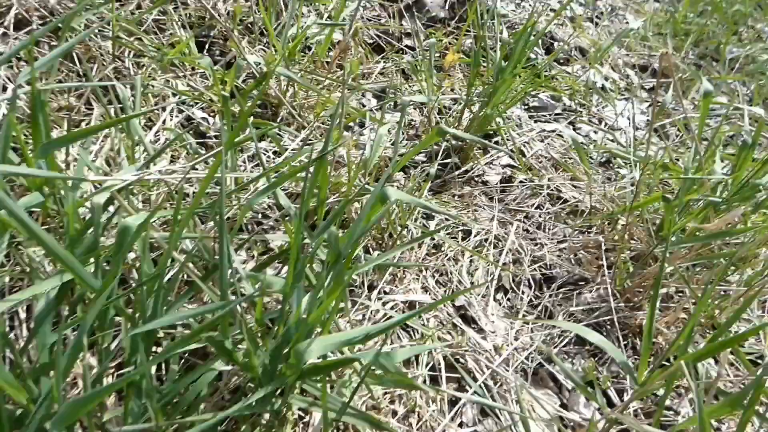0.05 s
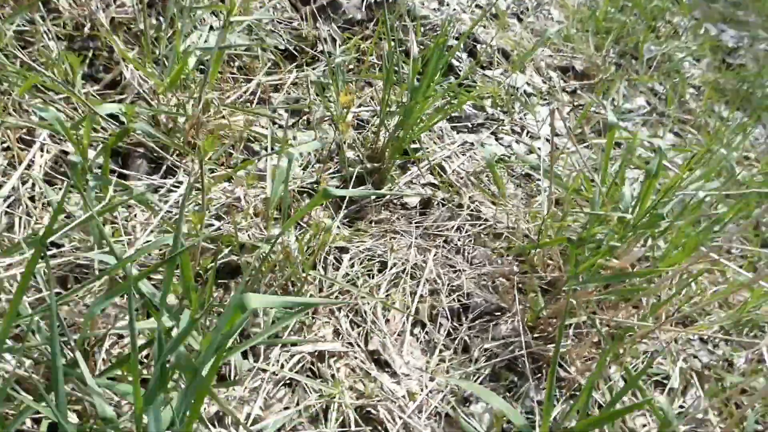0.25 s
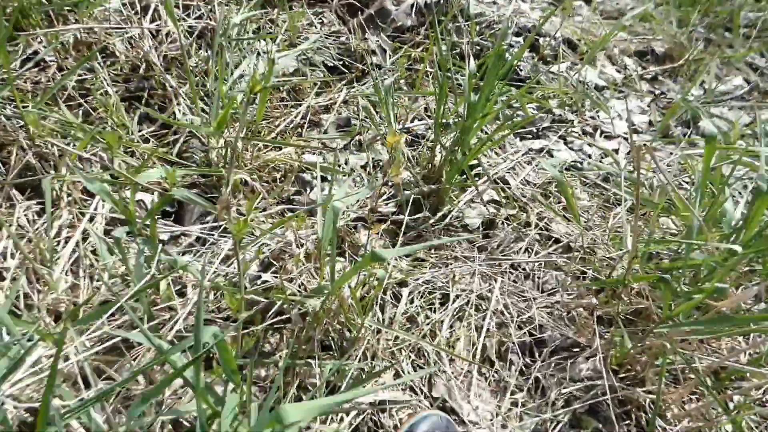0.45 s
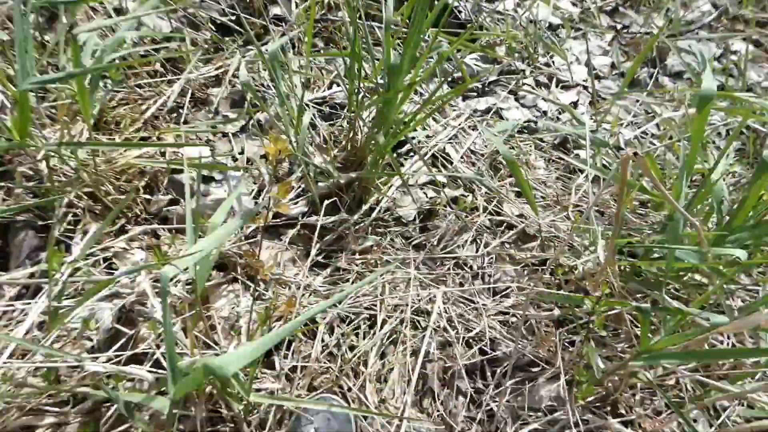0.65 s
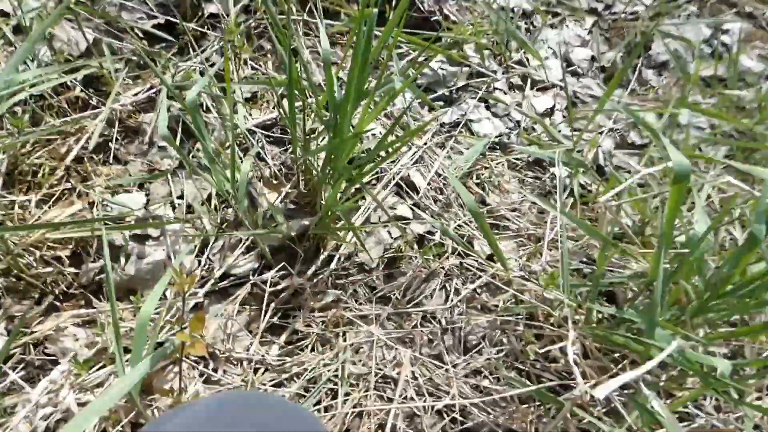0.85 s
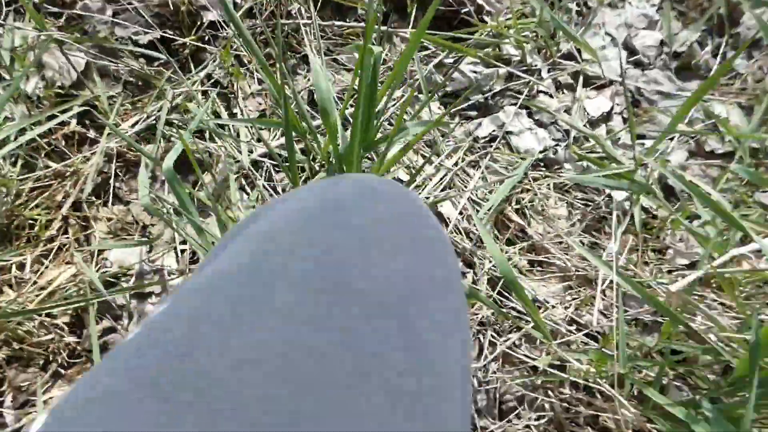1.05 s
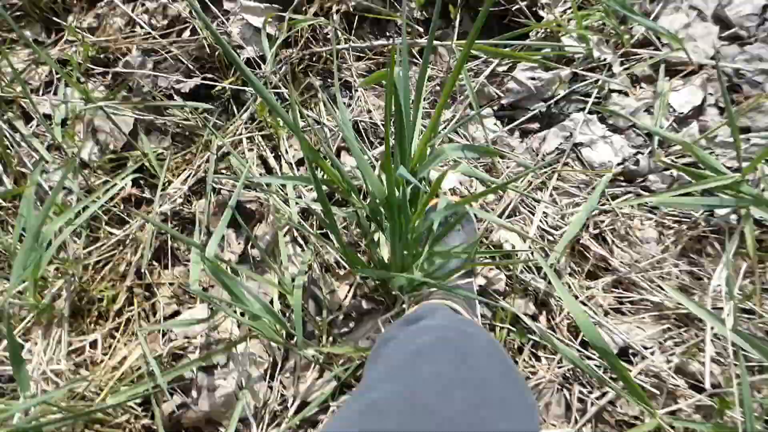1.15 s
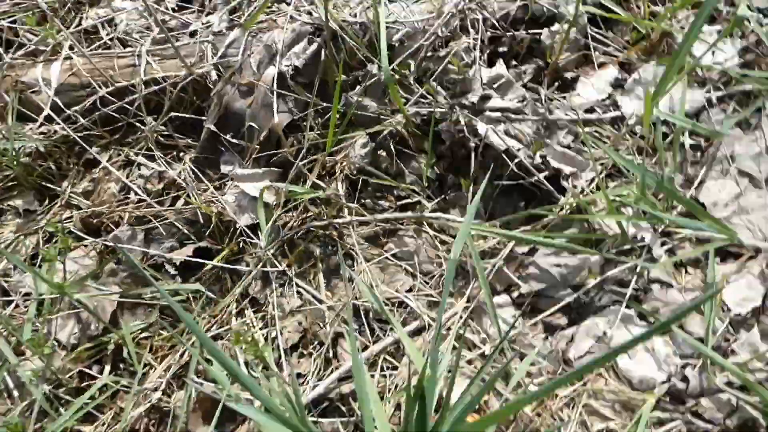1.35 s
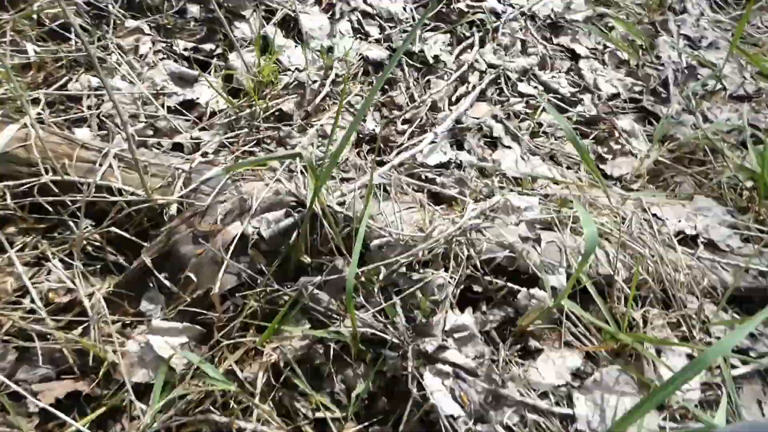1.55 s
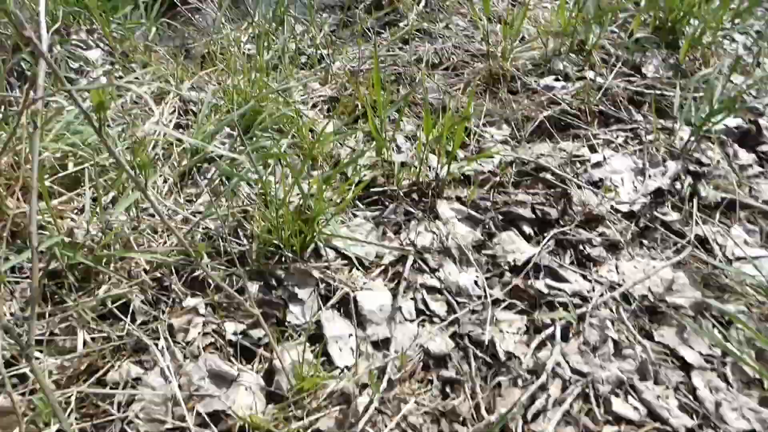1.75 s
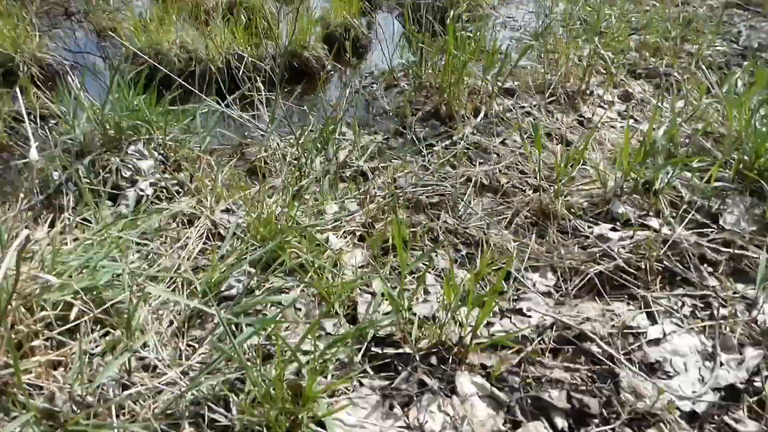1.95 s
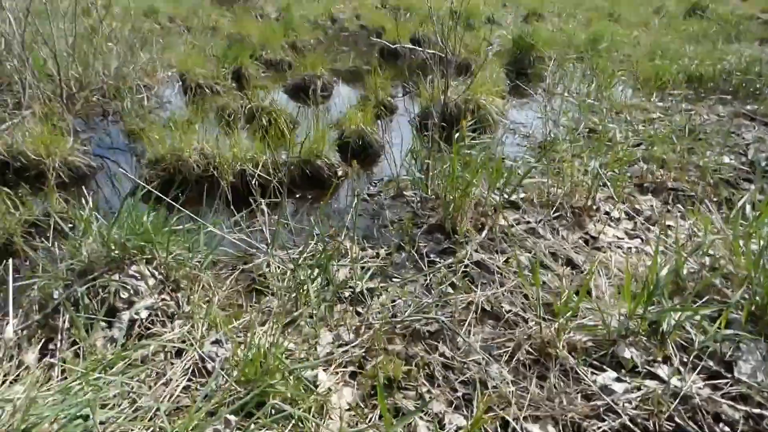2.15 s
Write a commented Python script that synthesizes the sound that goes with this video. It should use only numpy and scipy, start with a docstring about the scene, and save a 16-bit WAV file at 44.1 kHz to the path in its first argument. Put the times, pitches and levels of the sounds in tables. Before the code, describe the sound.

Three soft footsteps crunch through grass and dead leaves, with small stalks snapping.

```python
"""In the woods, someone carrying a camera takes three steps through grass and dead leaves.
Each sole crushes a shower of dry blades, which go on crackling as they settle. Single stalks snap,
legs rustle through the grass, and the air moves softly behind it all. Low bumps of air and handling
reach the microphone, and near the end something, probably a stem, scrapes briefly across it."""
import sys
import numpy as np
from scipy import signal
from scipy.fft import rfft, irfft
from scipy.io import wavfile

SR = 44100
rng = np.random.default_rng(int(sys.argv[2]) if len(sys.argv) > 2 else 0)


def materialize(psi):
    """Save the field psi as 16-bit PCM at rate SR to the path in sys.argv[1].

    A 1-D psi becomes a single channel; in a 2-D psi each row is a channel.
    """
    bounded = np.clip(np.atleast_2d(psi).T, -1, 1)
    quanta = np.round(bounded * 32767).astype(np.int16)
    wavfile.write(sys.argv[1], SR, quanta)


N = 96534
HIGHEST_HZ = 16200

# The tone of crushed blades and leaves: (frequency [Hz], relative level [dB])
CRUSH_TONE = [(60, -14.5), (250, -12.5), (550, -0.5), (1100, -0.5), (2600, 4), (3900, 0), (6000, 2.5),
              (7000, 0.5), (7900, -5.5), (10000, -1.5), (11500, -9.5), (13200, -15.5), (15500, -39)]
# Each press of a sole; the last step presses twice: (time of full weight [s], level [dB], rise [s],
# hold [s], swell during the hold [dB], fall [s], settling level [dB], settling time [s], treble [dB],
# crispness [dB], crispness frequency [Hz], left over right [dB], extra width [dB])
FOOTFALLS = [(0.568, -25, .017, 0.047, 1.5, 0.022, -6, 0.093, 0, 0.5, 5750, 1, -1.5),
             (1.14, -25, 0.026, 0.034, -2, 0.041, -2, 0.12, 1.5, -1.5, 2830, -1.1, -1.5),
             (1.689, -23, 0.015, 0.025, 0, 0.038, -10.5, 0.094, 1.5, 6.5, 4150, -1.2, 0),
             (1.780, -29.5, 0.028, .024, 2, 0.037, -23, .06, -0.5, 9, 4150, -2.4, 1.5)]


def footsteps():
    """The crunch grows as the sole comes down, crests under the weight and leaves the blades settling."""
    t, out = np.arange(N) / SR, np.zeros((2, N))
    grains = crackle(per_s=5000, spread_db=3, hiss=0.58, clump_db=0,
                     grain_s=0.00027, ring_s=0.0013, ring_db=0.5)
    for (at, db, rise, hold, swell_db, fall, settle_db, settle_s,
         treble_db, crisp_db, crisp_hz, pan_db, side_db) in FOOTFALLS:
        press = np.exp(np.minimum(t - at, 0) / rise)
        since_hold = np.maximum(t - at - hold, 0)
        settle = np.hypot(np.exp(-since_hold / fall), amp(settle_db) * np.exp(-since_hold / settle_s))
        swell = amp(swell_db * np.sin(np.pi * np.clip((t - at) / hold, 0, 1)))
        tone_db = curve(CRUSH_TONE) + treble(treble_db) + crisp_db * hump(crisp_hz, octaves=0.37)
        out += pan(db, pan_db) * stereo(grains * press * settle * swell, tone_db, side_db)
    return out


# The tone of a dry crack: (frequency [Hz], relative level [dB])
SNAP_TONE = [(100, -27), (500, -1.5), (6400, 0), (7900, -8), (9600, 1), (11500, -7), (13500, -14),
             (16000, -22)]
# Single stalks and leaves breaking, and at 2.012 s the sharp first tick of the stem scrape: # (time [s], level
# [dB], centre frequency [Hz], spread [octaves], left over right [dB])
STALK_SNAPS = [(0.0182, -33, 9500, 0.7, 1), (0.0300, -21.5, 7650, 0.71, 0), (0.0812, -25, 1880, 0.86, 1),
               (0.1156, -30, 6500, 1.3, 4), (0.1326, -25, 4000, 1.3, 6), (0.1396, -25, 6000, 0.6, 3),
               (0.149, -26.5, 7500, 0.81, 6), (0.1562, -25.5, 2980, 1.2, 2), (0.2447, -25, 6840, 1.2, 3),
               (0.2730, -24.5, 1080, 1.1, 0), (0.3844, -27, 5700, 1, 3.5), (0.5067, -32.5, 9050, 0.61, 9),
               (0.5636, -24, 2600, 5, 7), (0.5868, -20, 5000, .8, 2), (0.5928, -22, 5200, .5, -3),
               (0.63, -22, 1700, 0.61, -4), (0.6864, -28.5, 3000, 1.5, 2), (0.722, -30, 3520, 1.4, 4),
               (0.739, -28, 3170, 1.5, 6), (0.9105, -21.5, 3730, 0.28, 4), (1.1480, -15.5, 10500, 0.45, -4),
               (1.1815, -17, 9100, 0.46, 2), (1.2928, -28.5, 4960, 0.54, -7), (1.516, -24, 10600, 0.49, 1),
               (1.6341, -19.5, 10400, 0.57, 4), (1.6901, -16, 4300, 0.29, -3),
               (2.0122, -20.5, 11000, 1.2, 1.5), (2.1730, -29, 1600, 0.65, 2), (2.1756, -31, 1680, 0.36, 4)]


def snapping_stalks(break_s=0.0004, shake_s=0.003, shake_db=-16):
    """A stalk breaks within a millisecond and shakes its neighbours."""
    t, out = np.arange(0, 0.04, 1 / SR), np.zeros((2, N))
    fade = np.exp(-t / break_s) + amp(shake_db) * np.exp(-t / shake_s)
    for at, db, hz, octaves, pan_db in STALK_SNAPS:
        broad_floor = amp(-16) / np.hypot(1, frequencies() / hz / 2)
        tone_db = curve(SNAP_TONE) + 20 * np.log10(hump(hz, octaves) + broad_floor)
        snap = stereo(rng.choice([-1, 1], (2, len(t))) * fade, tone_db, side_db=-2)
        snap = unit_power(snap) * np.sqrt(0.001 / t[-1])  # the energy of one millisecond at 0 dB
        add(out, at, pan(db, pan_db) * snap)
    return out


# The tone of legs in the grass: (frequency [Hz], relative level [dB])
RUSTLE_TONE = [(60, -7.5), (300, 2), (600, 8), (1200, -1), (2400, 2), (4000, 0.5), (6400, 2), (7900, -2.5),
               (10000, 2), (11500, -6), (13200, -12), (15500, -23)]
# How loud that rustle is as the walk goes on: (time [s], level [dB])
RUSTLE_LOUDNESS = [(0, -54), (0.2, -42.5), (0.48, -42), (0.72, -40), (0.84, -41.5), (1.0, -39),
                   (1.08, -41.5), (1.35, -46.5), (1.6, -47.5), (1.85, -47.5), (1.97, -55), (2.19, -50.5)]
# Brushes against the grass: (time [s], level [dB], half length [s], treble [dB])
GRASS_BRUSHES = [(0.004, -38.5, 0.059, 6), (0.128, -39.5, 0.026, 5), (0.547, -41, .007, 0),
                 (0.889, -38.5, .010, 0.5), (0.911, -36, 0.0057, -1), (0.975, -47, 0.0042, 6),
                 (1.023, -38, 0.009, 0), (1.438, -36.5, 0.0062, -11.5), (1.523, -45, 0.06, -3),
                 (2.066, -46.5, 0.026, -9)]


def rustling_grass():
    """Legs rustle through the grass all the time, with a few firmer brushes a little to the left."""
    t = np.arange(N) / SR
    grains = crackle(per_s=1200, spread_db=3.5, hiss=1, clump_db=1.47,
                     grain_s=0.00018, ring_s=0.00057, ring_db=0)
    loudness = amp(np.interp(t, *np.transpose(RUSTLE_LOUDNESS)))
    out = stereo(grains * loudness, curve(RUSTLE_TONE), side_db=1.5)
    for at, db, half_s, treble_db in GRASS_BRUSHES:
        brush = stereo(grains * bell(t - at, half_s), curve(CRUSH_TONE) + treble(treble_db))
        out += pan(db, pan_db=1.8) * brush
    return out


# Soft bumps at the microphone: (time [s], level [dB], pitch [Hz], half length [s])
LOW_BUMPS = [(0.034, -33.5, 209, .008), (0.058, -27, 217, 0.0083), (0.087, -38, 176, .009),
             (0.120, -36, 165, .022), (0.180, -37.5, 151.4, .028), (0.235, -33, 188.6, 0.00938),
             (0.315, -32.5, 136, 0.007), (0.358, -28.5, 152, 0.0056), (0.377, -38, 110, 0.0084),
             (0.47, -41, 120, 0.013), (0.509, -37, 170, 0.016), (0.537, -31, 133, 0.0078),
             (0.56, -33, 232.6, 0.01), (0.684, -45, 465, 0.0053), (0.741, -38.5, 375, 0.0057),
             (0.855, -46.5, 110, .010), (0.895, -45, 102, .008), (0.941, -39, 130, 0.01166),
             (0.992, -47, 158, .008), (1.085, -44.5, 89, .012), (1.385, -45, 127, 0.00836),
             (1.498, -38, 134.5, 0.0095), (1.526, -39, 209.6, 0.01), (1.631, -36, 111, 0.0062),
             (1.741, -33, 137.4, .017), (1.820, -36.5, 231.5, 0.0096), (1.857, -41.5, 112.4, .013),
             (1.985, -50.5, 90, .012)]


def microphone_bumps(wobble_octaves=0.43, low_cut_hz=63):
    """Air and handling push on the microphone in short, low lumps of a few uneven cycles each."""
    out = np.zeros((2, N))
    for at, db, hz, half_s in LOW_BUMPS:
        t = np.arange(-3 * half_s, 3 * half_s, 1 / SR)
        wobble = np.array([wander(hz=130)[:len(t)] for _ in range(2)])
        pitch = hz * 2 ** (wobble_octaves * (wobble - wobble.mean(1, keepdims=True)))
        mid, side = np.sqrt(2) * amp(db) * bell(t, half_s) * sine_pair(pitch)
        add(out, at + t[0], left_right(mid, side, side_db=-9.5))
    return signal.sosfilt(signal.butter(3, low_cut_hz, "high", fs=SR, output="sos"), out)


# The notes of the scraped camera body: (pitch [Hz], pitch wobble [Hz], relative level [dB])
BODY_NOTES = [(311.4, 95, -1), (580, 106, -2), (874, 153, -7.5)]


def stem_scrape(at_s=2.0125, length_s=0.018, release_s=0.0049, slips_per_s=360, slip_s=0.0017):
    """Quick, uneven slips on the camera: each spits grit, and a low knock builds with the pressure."""
    t, out = np.arange(0, 0.1, 1 / SR), np.zeros((2, N))
    contact = np.exp(-np.maximum(t - length_s, 0) / release_s)
    slip_count = np.cumsum(slips_per_s * np.exp(0.35 * wander(hz=208)[:len(t)])) / SR
    slips = unit_power(np.exp(-(slip_count % 1) / slips_per_s / slip_s))
    scratch = rng.standard_normal((2, len(t))) * slips * contact
    grit = stereo(scratch, curve(SNAP_TONE) + treble(2), side_db=-4)
    body = np.zeros((2, len(t)))
    for hz, wobble_hz, db in BODY_NOTES:
        wobble = np.array([wander(hz=244)[:len(t)] for _ in range(2)])
        body += amp(db) * sine_pair(hz + wobble_hz * wobble)
    pressure = np.minimum(0.12 + 1.2 * t / length_s, 1)
    mid, side = unit_power(body) * pressure * contact
    knock = left_right(mid, side, side_db=-17)
    add(out, at_s, amp(-26.5) * grit + amp(-23) * knock)
    return out


# The tone of the moving air: (frequency [Hz], relative level [dB])
AIR_TONE = [(20, -42), (40, -32), (65, -3), (100, 2), (170, -2), (300, 0.5), (600, -7), (1500, -5.5),
            (3000, -12.5), (6000, -12.5), (12000, -62), (16000, -50)]


def woodland_air(level_db=-43.5, flutter_db=1):
    """Moving air makes a soft, low rush whose loudness flutters a little."""
    noise = rng.standard_normal((2, N))
    flutter = unit_power(amp(flutter_db * wander(hz=24)))
    return amp(level_db) * stereo(noise * flutter, curve(AIR_TONE))


def crackle(per_s, spread_db, hiss, clump_db, grain_s, ring_s, ring_db, leaf_kinds=48):
    """Tiny uneven cracks, each with its own direction and leaf ring, over the hiss of sliding blades."""
    breaks = rng.random(N) < per_s / SR
    size = breaks * amp(spread_db * np.minimum(rng.exponential(1, N), 3.5))
    kind, direction = rng.integers(0, leaf_kinds, N), rng.standard_normal(N)
    ring_pitches = (np.arange(leaf_kinds) + rng.random(leaf_kinds)) / leaf_kinds * HIGHEST_HZ
    t, cracks = np.arange(256) / SR, np.zeros((2, N))
    for leaf, hz in enumerate(ring_pitches):
        crack = unit_power(rng.standard_normal(len(t)) * np.exp(-t / grain_s))
        ring = unit_power(np.sin(2 * np.pi * hz * t) * np.exp(-t / ring_s))
        grain = crack + amp(ring_db) * ring
        starts = np.flatnonzero((kind == leaf) & breaks)
        samples = (starts[:, None] + np.arange(len(t))).ravel()
        for channel, weight in enumerate([size[starts], size[starts] * direction[starts]]):  # mid, side
            cracks[channel] += np.bincount(samples, np.outer(weight, grain).ravel(), N)[:N]
    sliding = hiss * rng.standard_normal((2, N))
    clumps = amp(clump_db * wander(hz=110))
    return unit_power((unit_power(cracks) + sliding) * clumps)


# How wide the sound is, from bass to treble: (frequency [Hz], side over mid [dB])
STEREO_WIDTH = [(60, -7), (200, -4.5), (400, -7), (1000, -9.5), (2800, -10.5), (3700, -11.5), (4600, -28),
                (6000, -40), (7500, -9.5), (9000, -7), (14000, -2)]


def stereo(pair, tone_db, side_db=0):
    """Gives a mid and side pair its tone and width, and turns it into left and right."""
    mid, side = colour(pair[0], tone_db), colour(pair[1], tone_db)
    return left_right(mid, colour(side, curve(STEREO_WIDTH), keep_power=False), side_db)


def left_right(mid, side, side_db):
    """Mid is what both ears share; side is added on the left and taken away on the right."""
    return mid + np.array([[1], [-1]]) * amp(side_db) * side


def pan(db, pan_db):
    """Left and right gains; a positive pan_db favours the left."""
    return amp(db + np.array([[pan_db], [-pan_db]]) / 2)


def colour(x, tone_db, keep_power=True):
    """Filters a sound with no echo ahead of it; keep_power leaves white noise just as strong."""
    log_gain = np.log(amp(np.maximum(tone_db, -100)))
    mirrored = np.r_[log_gain, log_gain[-2:0:-1]]
    taps = np.fft.ifft(np.exp(np.conj(signal.hilbert(mirrored)))).real[:len(tone_db)]
    return signal.fftconvolve(x, taps / (np.linalg.norm(taps) if keep_power else 1))[:len(x)]


def frequencies():
    """The frequencies [Hz] at which a tone is drawn."""
    return np.fft.rfftfreq(4096, 1 / SR)


def curve(points):
    """Joins (frequency, value) points with lines, giving each octave equal room."""
    hz, value = np.transpose(points)
    return np.interp(np.log(frequencies() + 1), np.log(hz + 1), value)


def treble(db):
    """A tone that turns the highs up or down."""
    return db * curve([(5500, 0), (9000, 1)])


def hump(hz, octaves):
    """A rounded peak around one frequency."""
    return bell(np.log2((frequencies() + 1) / hz), octaves)


def bell(x, half_width):
    """A smooth hill, 1 high at x = 0."""
    return np.exp(-(x / half_width) ** 2 / 2)


def sine_pair(hz):
    """Two waves that follow changing pitches, each starting anywhere in its cycle."""
    return np.sin(2 * np.pi * (np.cumsum(hz, 1) / SR + rng.random((2, 1))))


def wander(hz):
    """A random wobble of about size 1, mostly slower than hz."""
    smoothing = 1 + (np.fft.rfftfreq(N, 1 / SR) / hz) ** 4
    return unit_power(irfft(rfft(rng.standard_normal(N)) / smoothing, N))


def amp(db):
    """Turns decibels into a gain."""
    return 10 ** (np.asarray(db) / 20)


def unit_power(x):
    """Scales a sound to an average power of 1."""
    return x / np.sqrt(np.mean(x ** 2) + 1e-20)


def add(mix, at_s, sound):
    """Mixes a sound in at its time."""
    part = mix[:, max(round(at_s * SR), 0):][:, :sound.shape[1]]
    part += sound[:, :part.shape[1]]


def scene():
    """Everything that reaches the microphone."""
    walking = footsteps() + snapping_stalks() + rustling_grass()
    return walking + microphone_bumps() + stem_scrape() + woodland_air()


def record(dry):
    """The camera drops rumble below 27 Hz and the very highest treble."""
    no_rumble = signal.sosfilt(signal.butter(2, 27, "high", fs=SR, output="sos"), dry)
    high_cut = signal.firwin(511, HIGHEST_HZ, window=("kaiser", 9), fs=SR)
    return signal.oaconvolve(no_rumble, high_cut[None], "same")


dry = scene()
out = record(dry)
materialize(out)
```